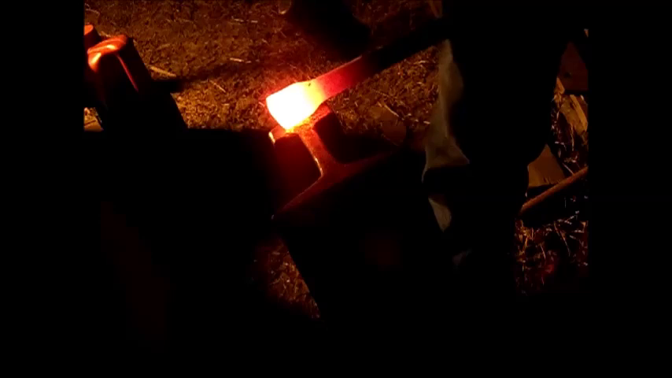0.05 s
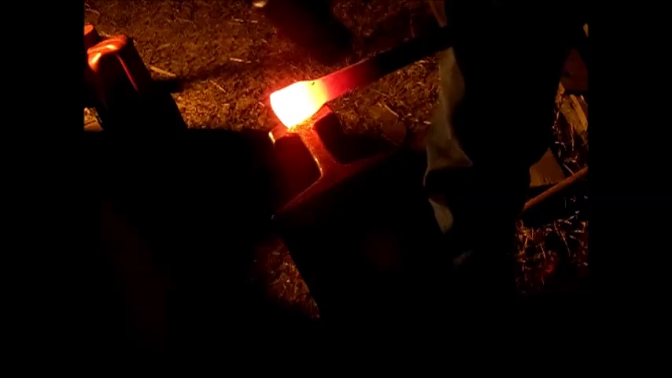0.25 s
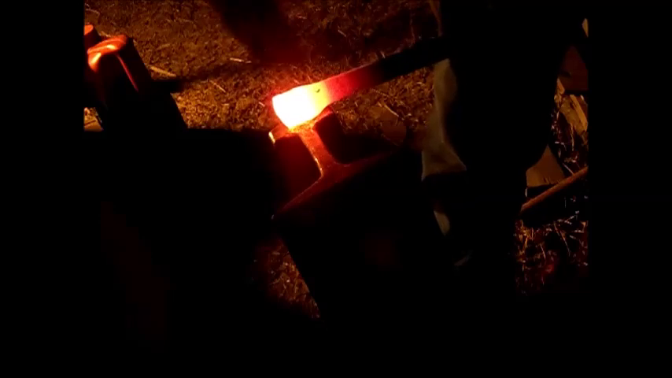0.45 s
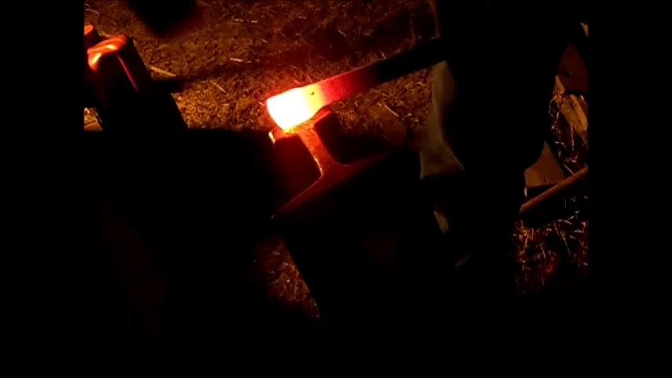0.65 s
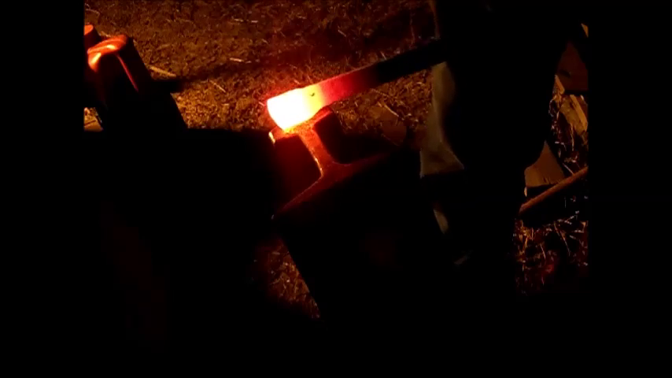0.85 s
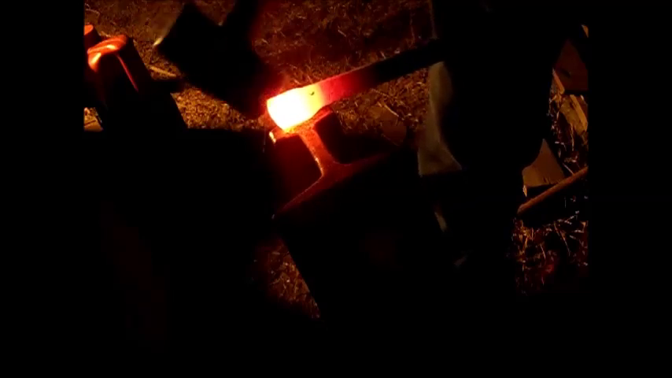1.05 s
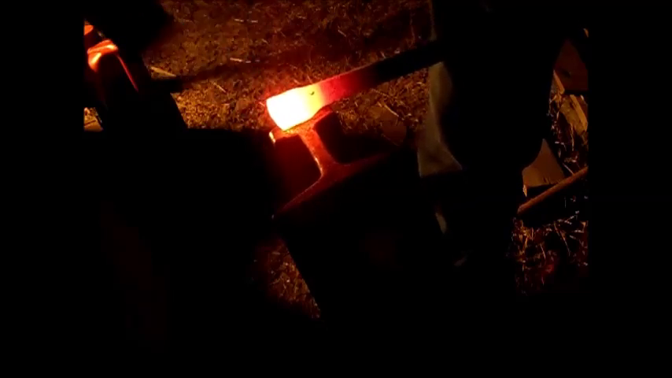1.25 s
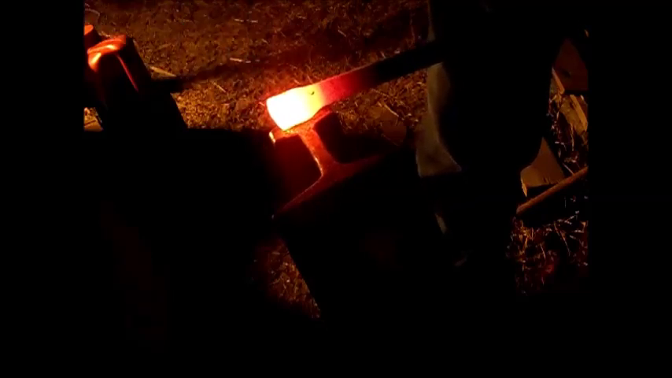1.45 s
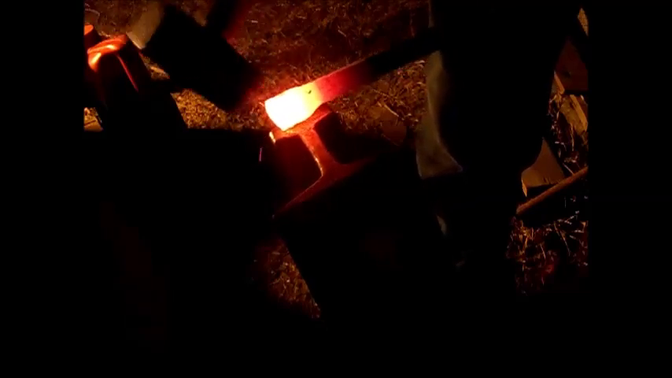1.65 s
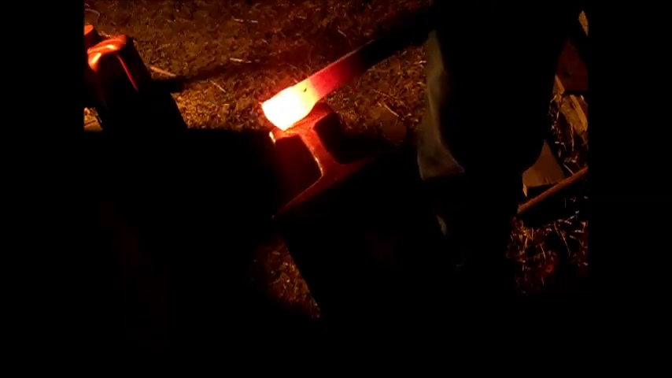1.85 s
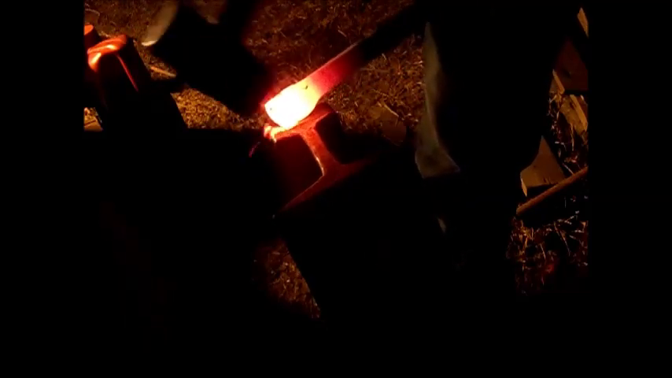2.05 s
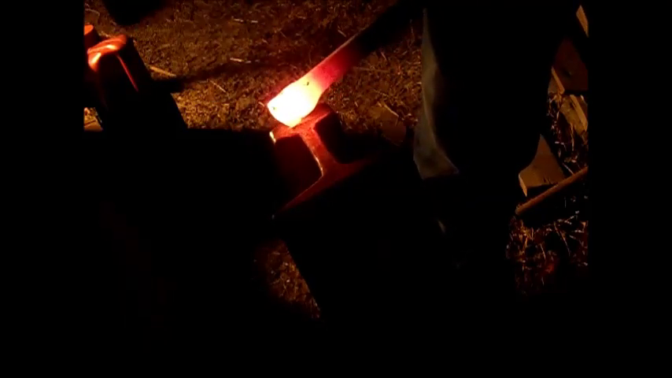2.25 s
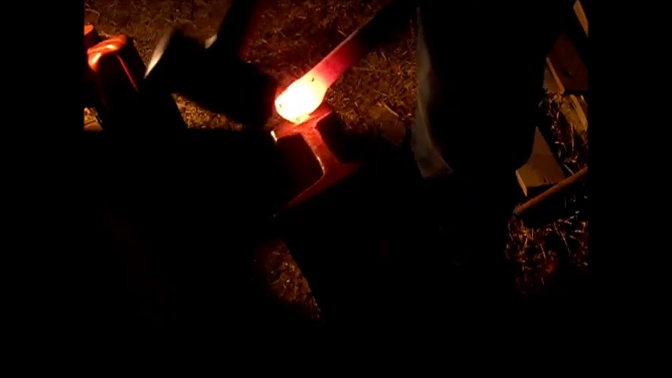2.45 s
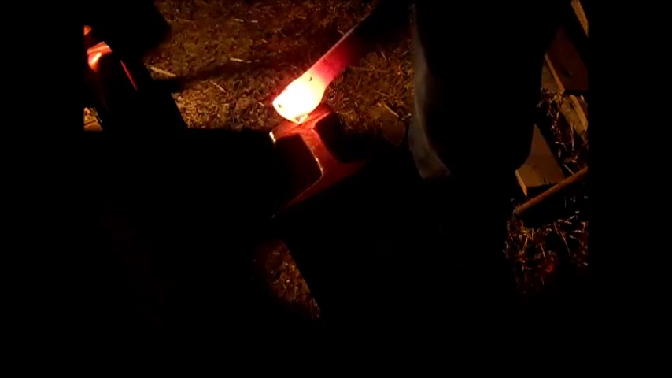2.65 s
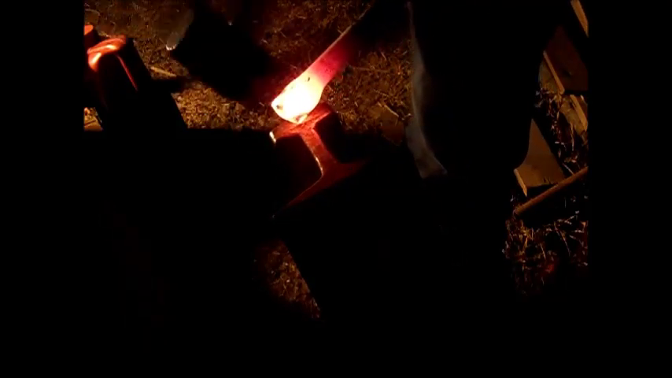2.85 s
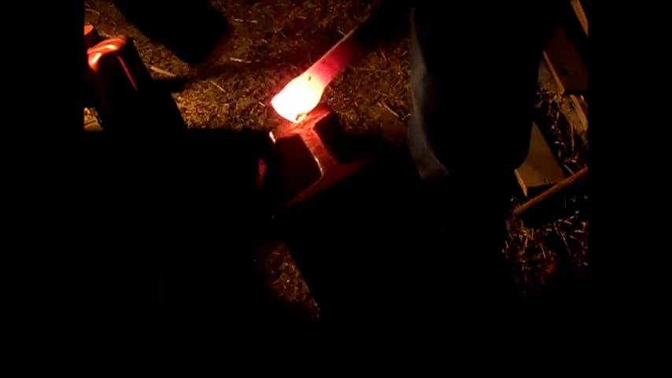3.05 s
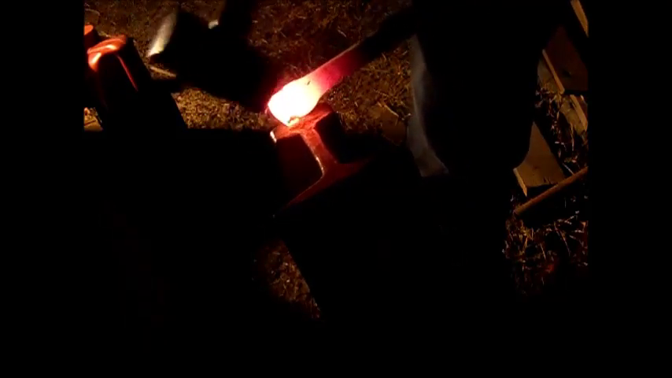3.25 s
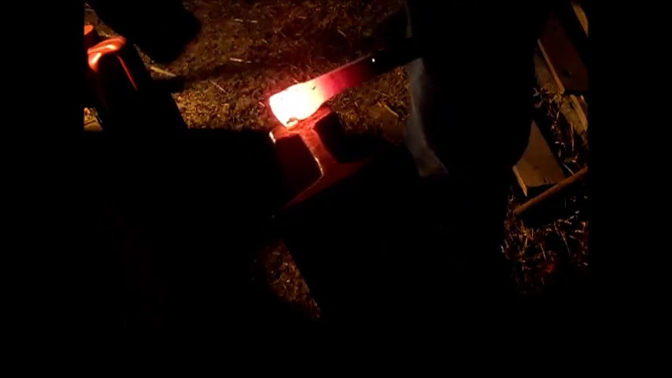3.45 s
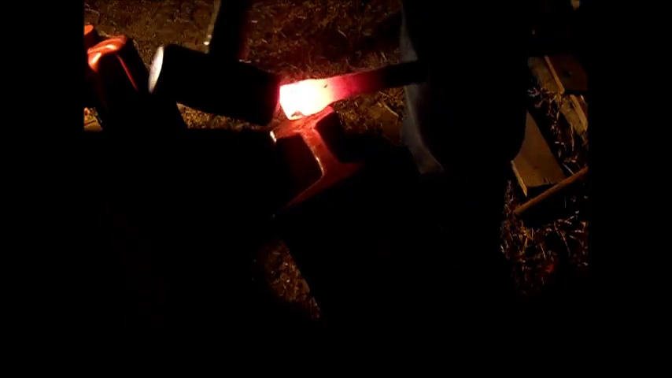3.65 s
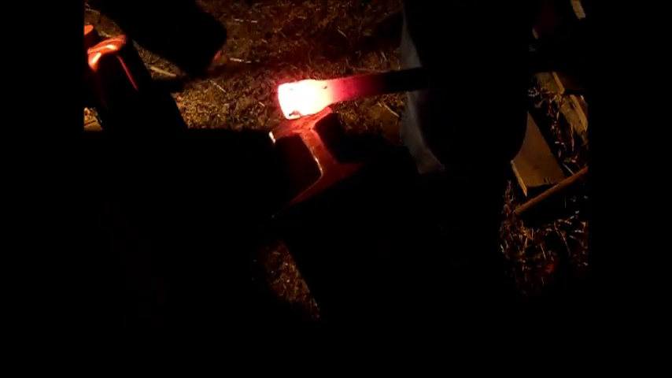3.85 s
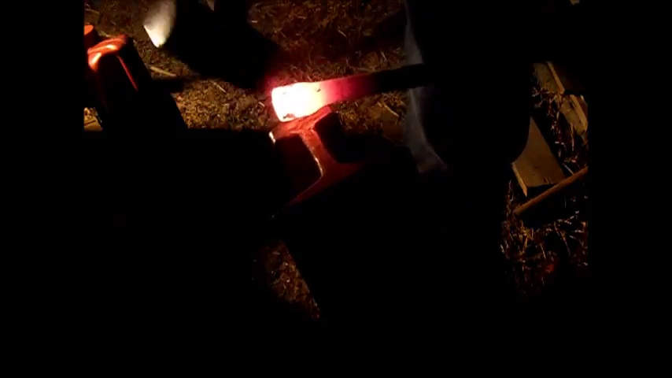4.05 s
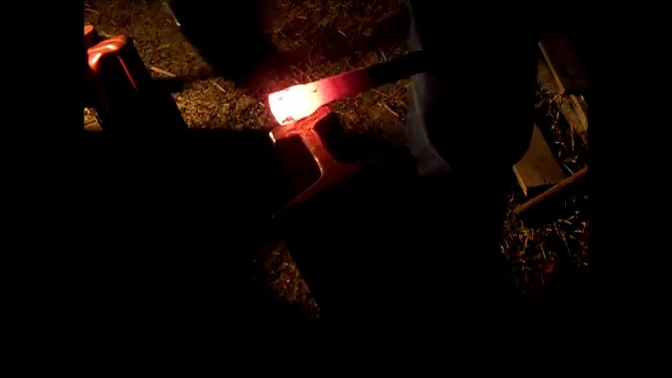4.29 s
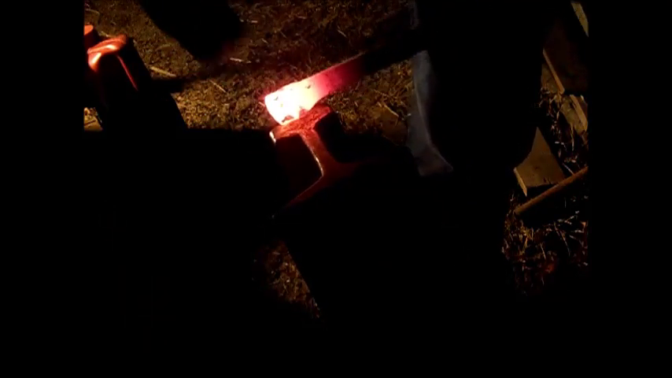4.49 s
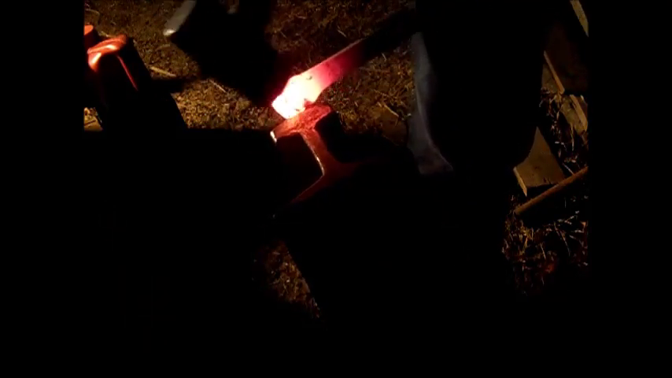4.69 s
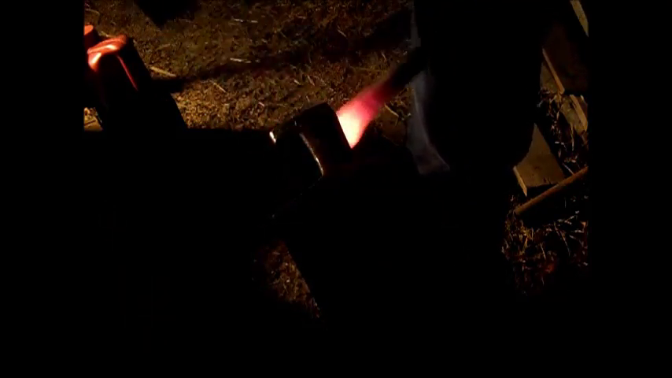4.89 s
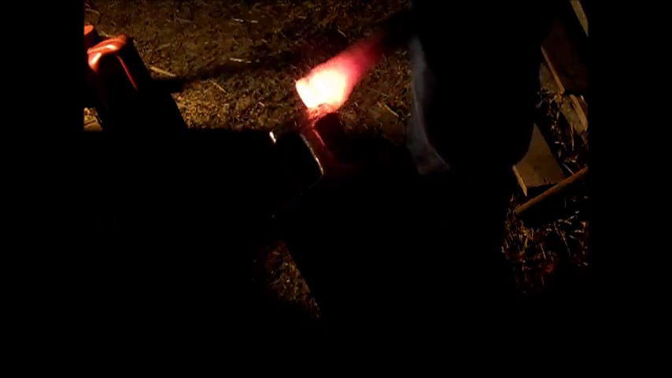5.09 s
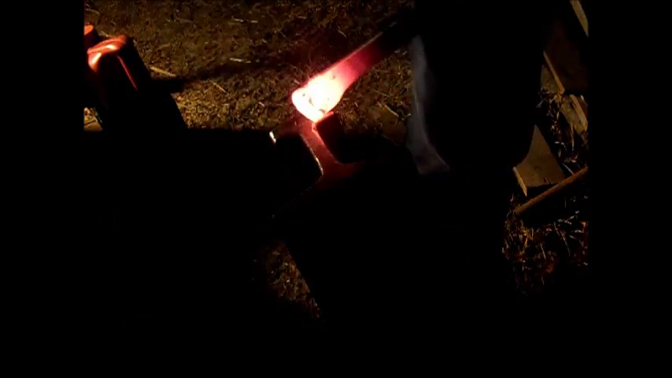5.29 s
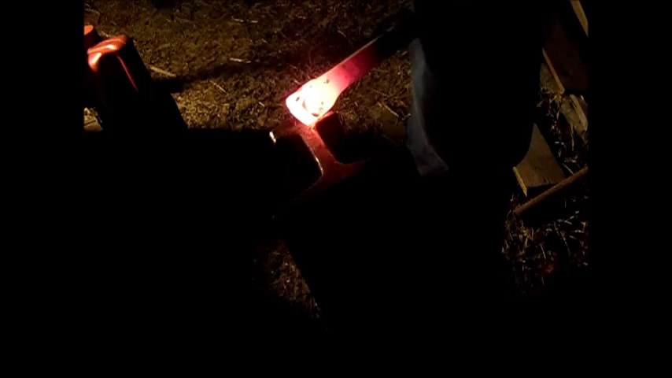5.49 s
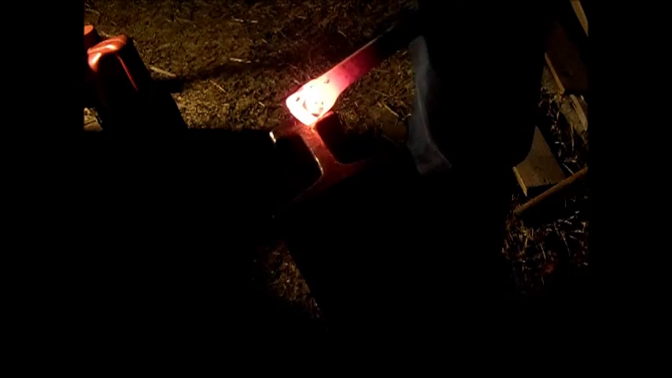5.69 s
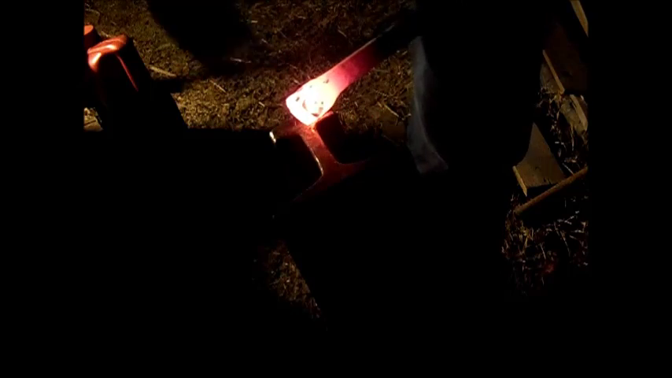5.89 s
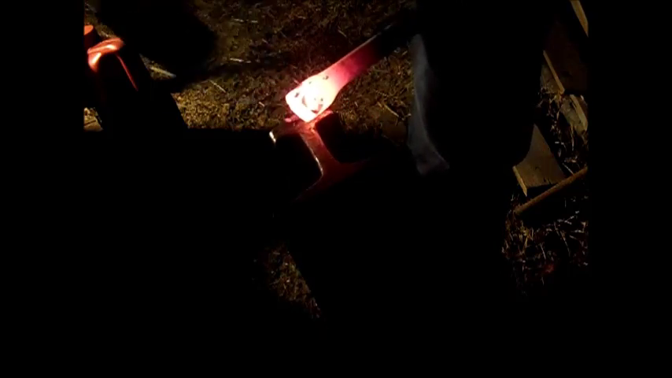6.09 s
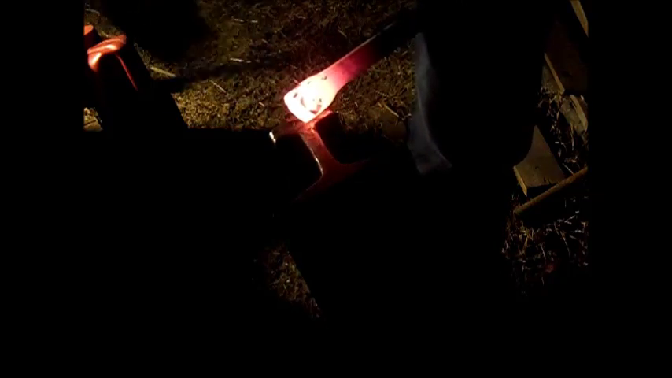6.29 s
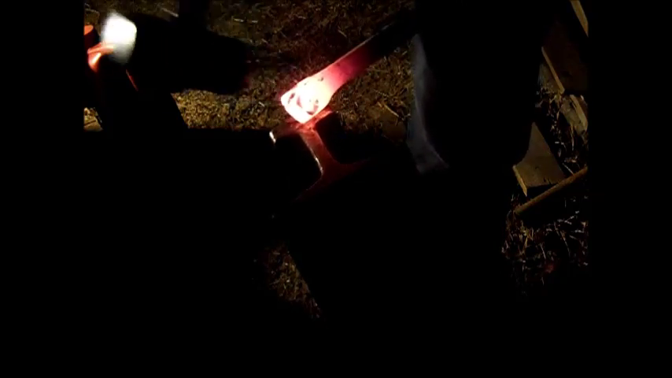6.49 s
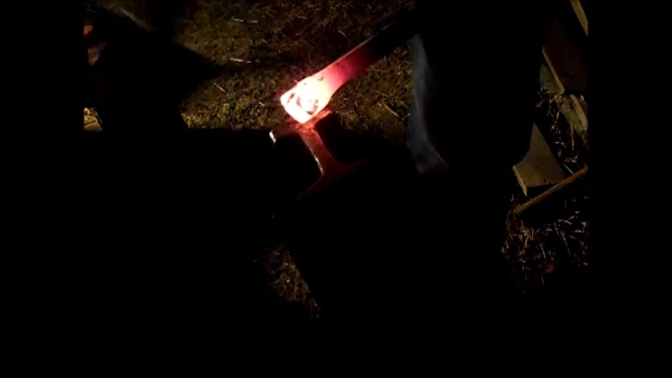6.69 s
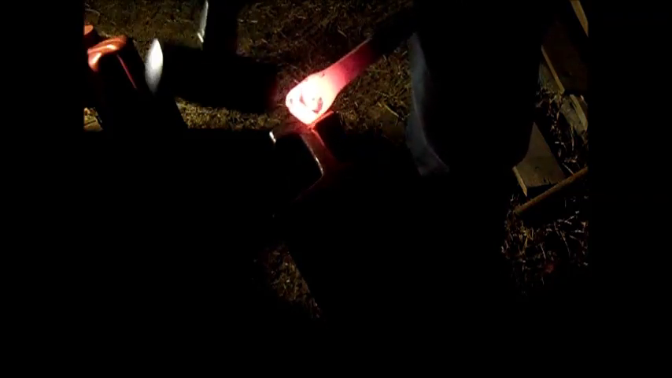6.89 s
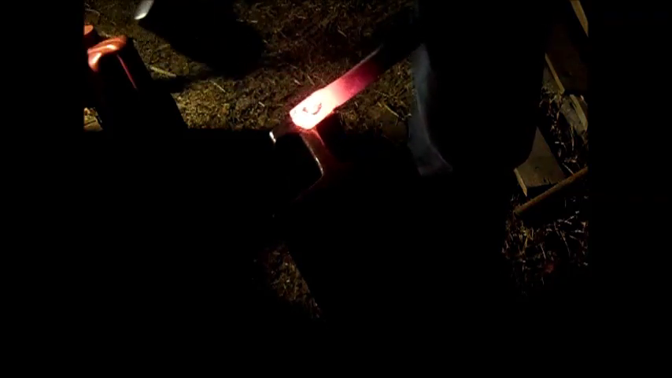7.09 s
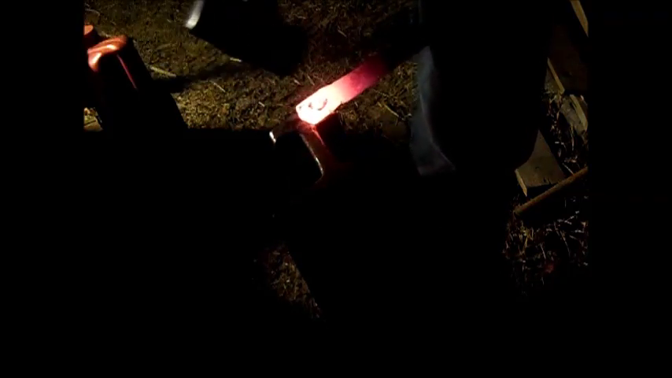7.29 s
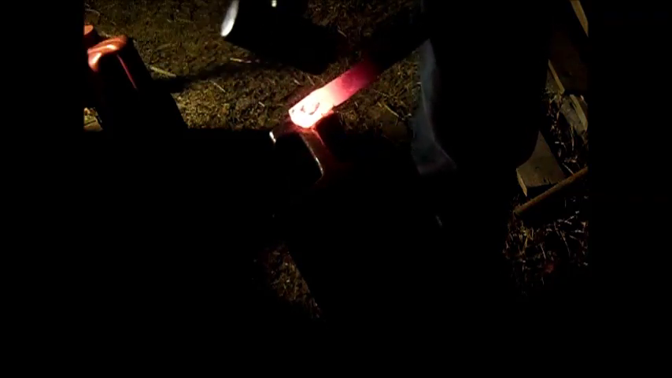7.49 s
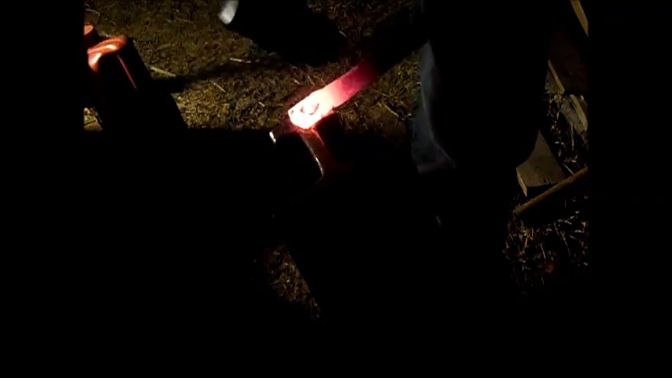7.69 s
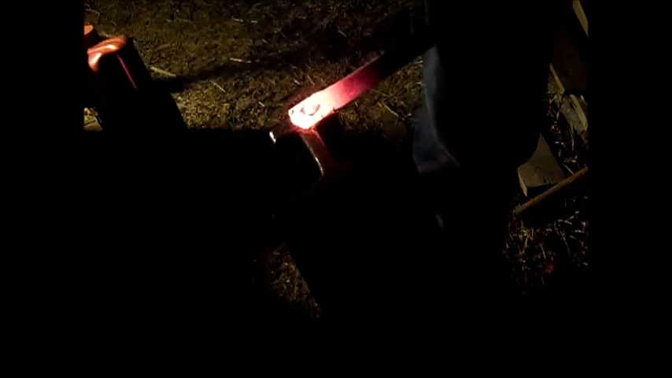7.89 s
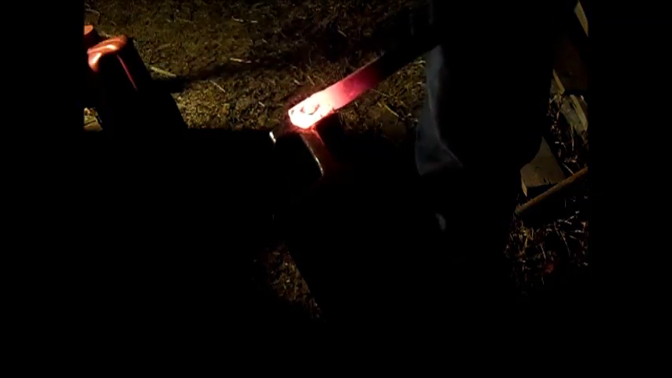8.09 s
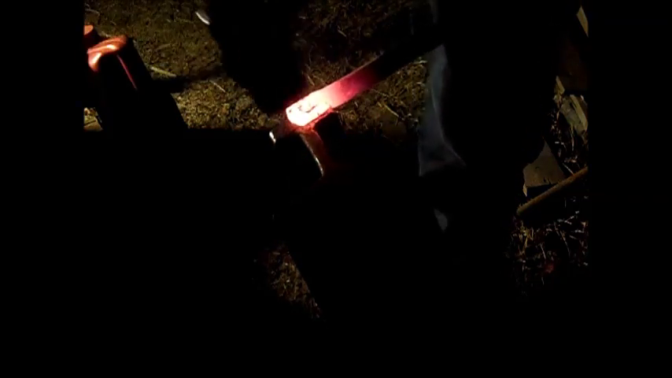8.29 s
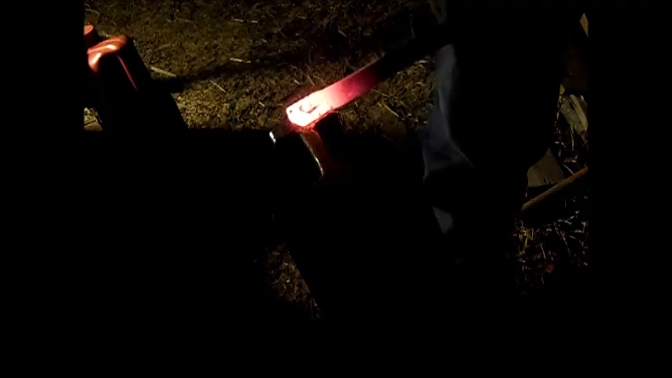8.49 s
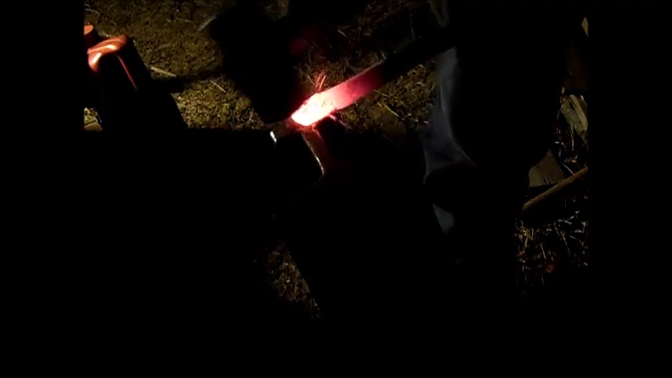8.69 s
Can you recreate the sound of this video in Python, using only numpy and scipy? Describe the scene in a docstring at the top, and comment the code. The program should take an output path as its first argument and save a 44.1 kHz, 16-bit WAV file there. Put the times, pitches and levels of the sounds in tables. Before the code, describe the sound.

A forge blower opens alone, a steady electric whine with harmonics, rushing air and low rumble, with a faint cloth rustle. At about 1.1 s a hard hammer blow cracks on hot steel over a rail anvil, close and slightly overloaded; loose iron rattles after it. More strong blows land at 1.6, 2.05, 2.5 and 2.9 s, the later ones brighter with a thin high hammer ring. Each is short and clanky, with a low stump thump and quick outdoor echo. Weaker hits follow at 3.3, 3.6, 4.0, 4.3 and 4.7 s, with bounces. From 4.8 to 5.4 s cloth rustles and the bar taps and scrapes. Softer blows come at 6.0, 6.4 and 6.8 s, then faint rustles and tiny taps. A light blow at 8.2 s bounces; a stronger, bright one ends near 8.7 s. The blower steps quieter after every blow.

```python
"""A hammer beats a glowing bar on a rail anvil outdoors, near the microphone. Each blow is a noise crack with
echoes, ringing rail modes, a thump of the stump and the hammer head singing high. The bar bounces as scraped,
ringing contacts and loose iron rattles in short ticks. Behind, a forge blower whines (shaft harmonics) and
rushes (shaped noise), a step quieter after every blow; cloth rustles and a low rumble lies underneath.
Blows overload the recorder, which flattens and ducks them."""
import sys
import numpy as np
from scipy import signal
from scipy.fft import rfft, irfft, next_fast_len
from scipy.io import wavfile

SR = 44100
rng = np.random.default_rng(int(sys.argv[2]) if len(sys.argv) > 2 else 0)


def pcm_store(signal):
    """Save signal as 16-bit PCM."""
    levels = np.round(np.clip(np.atleast_2d(signal), -1, 1) * 32767)
    wavfile.write(sys.argv[1], SR, levels.astype(np.int16).T)


N = 385434   # length [samples]


def from_db(db):
    """Gain of a level in dB."""
    return 10 ** (np.asarray(db) / 20)


def rms_one(x):
    """Scaled to rms 1."""
    return x / np.sqrt(np.mean(x ** 2) + 1e-20)


def at_hz(hz, points_hz, values):
    """Reads a table on a log-frequency axis."""
    return np.interp(np.log(hz), np.log(points_hz), values)


def filtered(order, edge_hz, kind, x):
    """Butterworth filter."""
    return signal.sosfilt(signal.butter(order, edge_hz, kind, fs=SR, output="sos"), x)


def smoothed(x, seconds):
    """One-pole smoothing with a time constant."""
    r = np.exp(-1 / (seconds * SR))
    return signal.lfilter([1 - r], [1, -r], x)


def drift(rate_hz):
    """Slow random wander of rms 1, drawn every 40 samples and joined by straight lines."""
    r = np.exp(-80 * np.pi * rate_hz / SR)
    noise = rng.standard_normal(N // 40 + 2002)
    slow = signal.lfilter([1], [1, -2 * r, r * r], noise)[2000:]   # skips the filter's run-in
    return np.interp(np.arange(N) / 40, np.arange(len(slow)), rms_one(slow))


def ring(force, hz, t60):
    """A damped resonator: a unit click sets a sine of height 1 ringing, 60 dB down after t60 seconds."""
    r, w = from_db(-60 / (t60 * SR)), 2 * np.pi * hz / SR
    return signal.lfilter([0, np.sin(w)], [1, -2 * r * np.cos(w), r * r], force + 1e-18)


def ring_each(force, hz, t60):
    """One mode rung by each row of force, all rows with the same energy."""
    sound = ring(force, hz, t60)
    energy = np.mean(sound ** 2, axis=1, keepdims=True)
    return sound * np.sqrt(energy.mean() / energy)


def mode_shares(count, modes, spread_db):
    """Random gain and sign with which each contact wakes each mode."""
    size = (count, modes)
    return from_db(rng.normal(0, spread_db, size)) * rng.choice([-1, 1], size)


def coloured(spectrum):
    """Noise with a given spectrum; rms 1."""
    size = next_fast_len(N)
    hz = np.maximum(np.fft.rfftfreq(size, 1 / SR), 1)
    gain = from_db(at_hz(hz, *np.transpose(spectrum)))
    return rms_one(irfft(rfft(rng.standard_normal(size)) * gain, size)[:N])


def contacts(count, seconds, t60, grind_db):
    """One force a row: a click, then grinding noise that dies away."""
    t = np.arange(int(seconds * SR)) / SR
    force = from_db(grind_db - 60 * t / t60) * rng.standard_normal((count, len(t)))
    force[:, 0] += 1
    return force


def place(sounds, times):
    """Lays each row on the time line."""
    out = np.zeros(N + sounds.shape[1])
    for sound, s in zip(sounds, times):
        start = round(s * SR)
        out[start:start + len(sound)] += sound
    return out[:N]


# frequencies at which the colour of a blow is set: [Hz]
SPOT_HZ = [500, 1100, 2100, 3200, 4700, 6300, 8700]
# how strongly a blow wakes the modes around each of those frequencies: [dB]
SPOT_DB = [-17, -14, -18, -16.5, -18, -17, -20.5]
CLANK_DB, CLANK_OCTAVES = 5.5, .35   # boost at the clank centre, its half-width to 1/e


def blow_colour(thud_db, tilt_db, clank_hz):
    """Spectrum of each blow: a clank hump, extra low thud and a brightness tilt about the fourth frequency."""
    octaves_off = np.log2(SPOT_HZ / clank_hz)
    spot_db = SPOT_DB + CLANK_DB * np.exp(-(octaves_off / CLANK_OCTAVES) ** 2)
    spot_db[:, :1] += thud_db
    spot_db[:, 1:] += tilt_db * np.log2(np.array(SPOT_HZ[1:]) / SPOT_HZ[3])
    return spot_db


# modes of the rail: (frequency [Hz], level [dB], t60 [s])
RAIL_MODES = [(452, -5, 0.078), (640, -1.5, .03), (751, -5.5, 0.047), (1017, 2.5, 0.05), (1195, -3, 0.052),
              (1837, -2.5, .04), (2033, -1.5, 0.057), (2138, -3, 0.065), (2396, -8, .05),
              (2830, -3.5, 0.045), (3107, -1, .04), (3290, -5.5, 0.058), (3688, -10, 0.032),
              (4220, -9, 0.065), (4604, -1, .05), (5015, -4.5, .04), (5360, -8, 0.053), (5800, -10, 0.053),
              (6277, -4, 0.033), (6230, -10, 0.046), (7690, -7, 0.053), (8270, -14, 0.074),
              (9000, -16.5, 0.042), (10130, -12.5, 0.057), (12300, -29.5, .04)]
CRUSH_T60_S, CRUSH_DB = 0.023, -4.5   # grinding that follows the click of the blow


def rail_modes(spot_db, t):
    """Each blow's click and crush ring the rail's modes."""
    force = contacts(len(spot_db), .6, CRUSH_T60_S, CRUSH_DB)
    share = mode_shares(len(spot_db), len(RAIL_MODES), 2.5)
    sound = 0
    for k, (hz, level_db, t60) in enumerate(RAIL_MODES):
        spot = np.array([at_hz(hz, SPOT_HZ, row) for row in spot_db])
        gain = share[:, k] * from_db(level_db + spot)
        swell = 1 - np.exp(-t * hz / 1.4)     # a mode builds up over a few cycles
        sound = sound + gain[:, None] * swell * ring_each(force, hz, t60)
    return sound


CRACK_DB, CRACK_T60_S = 15, 0.049   # decay times of crack and yard hold at 3 kHz
YARD_DB, YARD_T60_S = -8, 0.22
CHATTER_HZ, CHATTER_DB = 110, 1   # the tail is lumpy: the bar chatters on the rail


def crack_and_echoes(spot_db, t):
    """Noise bands share the colour of the blow: a short crack, then a longer yard tail; treble dies first."""
    size = (len(spot_db), len(t))
    chatter_db = CHATTER_DB * rms_one(filtered(2, CHATTER_HZ, "low", rng.standard_normal(size)))
    sound = 0
    for k, hz in enumerate(SPOT_HZ):
        crack = from_db(CRACK_DB - 60 * t * (hz / 3000) ** 0.059 / CRACK_T60_S)
        echoes = from_db(YARD_DB + chatter_db - 60 * t * (hz / 3000) ** 0.39 / YARD_T60_S)
        noise = (crack + echoes) * rng.standard_normal(size)
        band = filtered(2, [hz / 1.4, hz * 1.6], "band", noise) * np.sqrt(5000 / hz)
        sound = sound + from_db(spot_db[:, k:k + 1]) * band * (1 - np.exp(-t * hz / 1.2))
    air = filtered(2, 10500, "high", rng.standard_normal(size))
    return sound + from_db(spot_db[:, -1:] - 6 - 60 * t / .03) * air


HAMMER_LOW_HZ, HAMMER_LOW_T60_S = 6095, .12
HAMMER_HIGH_HZ, HAMMER_HIGH_T60_S = 10997, 0.41
# low ring: level at strength 0 and tilt 0, then its shares of strength and brightness tilt
HAMMER_LOW_DB, HAMMER_LOW_FOLLOWS, HAMMER_LOW_PER_TILT = -16, 0.64, 0.89


def hammer_ring(strength_db, tilt_db, high_db, click):
    """The hammer head rings in a low mode and in a high pair, 22 Hz apart, that beats."""
    low_db = HAMMER_LOW_DB + HAMMER_LOW_FOLLOWS * strength_db + HAMMER_LOW_PER_TILT * tilt_db
    low = ring(click, HAMMER_LOW_HZ, HAMMER_LOW_T60_S)
    beat = ring(click, HAMMER_HIGH_HZ, HAMMER_HIGH_T60_S)
    beat = beat + 0.12 * ring(click, HAMMER_HIGH_HZ + 22, HAMMER_HIGH_T60_S)
    return from_db(low_db) * low + from_db(high_db) * beat


STUMP_HZ, STUMP_T60_S = 45, .15
STUMP_DB, STUMP_FOLLOWS = -20.5, .25   # level at strength 0, share of strength
# a higher, shorter mode; its level is relative to the thump
STUMP_KNOCK_HZ, STUMP_KNOCK_DB, STUMP_KNOCK_T60_S = 162, -8.5, 0.05


def stump_thump(strength_db, click, t):
    """The stump under the rail answers with a soft low thump and a knock."""
    thump = ring(click, STUMP_HZ, STUMP_T60_S) * (1 - np.exp(-t / .012))
    knock = from_db(STUMP_KNOCK_DB) * ring(click, STUMP_KNOCK_HZ, STUMP_KNOCK_T60_S)
    return from_db(STUMP_DB + STUMP_FOLLOWS * strength_db) * (thump + knock)


# hammer blows: (time [s], strength [dB], low thud over the rest [dB], brightness tilt [dB per octave],
#                clank centre [Hz], high hammer ring [dB], bounce of the bar [dB])
BLOWS = [(1.105, -3.5, 9, 1, 3200, -47, -28), (1.596, -1.5, 6, 0, 4700, -36, -29.5),
         (2.052, -0.5, -8, 2.5, 4400, -38.5, -15), (2.485, -2.5, -2, 6, 3300, -21, -32),
         (2.895, -2.5, -0.5, 3.5, 3200, -24.5, -19.5), (3.273, -8, -3, 4, 3500, -34, -15.5),
         (3.629, -17.5, 10, -2.5, 3600, -50, -40), (3.993, -18, 10, -1, 4700, -53, -29),
         (4.342, -12.5, 3, 0.5, 4400, -41.5, -33), (4.713, -10.5, -4, 2.5, 6300, -34.5, -24),
         (5.975, -13.5, 3.5, 3, 4700, -51, -22.5), (6.394, -18.5, 8, -0.5, 4700, -47, -27.5),
         (6.789, -17, 3.5, 0.5, 5500, -63, -45), (8.223, -19, 0.5, 3, 6100, -53, -37),
         (8.687, -6.5, -18, 3, 3300, -23.5, -30)]
RADIATE_FROM_HZ = 326   # the rail is too small to radiate lower


def blows():
    """Every blow drives rail, crack, echoes, hammer head and stump together."""
    rows = np.array(BLOWS)
    strength_db, thud_db, tilt_db, clank_hz, high_db = rows[:, 1:6].T[:, :, None]
    spot_db = blow_colour(thud_db, tilt_db, clank_hz)
    t = np.arange(int(.6 * SR)) / SR
    click = t == 0
    rail = rail_modes(spot_db, t) + crack_and_echoes(spot_db, t)
    sound = from_db(strength_db) * filtered(4, RADIATE_FROM_HZ, "high", rail)
    sound = sound + hammer_ring(strength_db, tilt_db, high_db, click)
    sound = sound * (1 - np.exp(-t / 0.00038))     # hot steel gives way: the attack is rounded
    return place(sound + stump_thump(strength_db, click, t), rows[:, 0])


# the bar bounces again or is set down on the rail: (time [s], strength [dB])
TAPS = [(3.3242, -21), (4.3963, -28), (4.428, -47), (4.8587, -45), (4.8832, -44), (4.9003, -40),
        (4.914, -43), (4.9413, -45.5), (5.0606, -47), (5.099, -44), (5.131, -40.5), (5.1505, -47),
        (5.3315, -25.5), (5.379, -36), (5.4056, -43), (7.6389, -57.5), (7.746, -52.5), (7.7634, -48),
        (8.2657, -32), (8.2844, -32)]
# modes of bar and tongs: (frequency [Hz], level [dB], t60 [s])
BAR_MODES = [(415, -3.5, 0.044), (1050, -3, .025), (1226, -2, 0.039), (2010, 0.5, .03), (2383, -3.5, 0.026),
             (3100, -0.5, .03), (3354, -7, 0.037), (4440, -2.5, 0.023), (4657, -8.5, .03),
             (4960, -4, 0.019), (6300, -15, 0.012)]
BOUNCE_S = .0291   # the bar lands again this long after a blow
TAP_TILT_DB, TAP_TILT_PER_DB = 6, 0.1963   # harder contacts are brighter [dB per octave]
BAR_RING_DB, SCRAPE_DB = -27, -3.0


def taps():
    """Light contacts scrape and ring the bar briefly."""
    bounces = [(row[0] + BOUNCE_S, row[-1]) for row in BLOWS]
    s, strength_db = np.transpose(TAPS + bounces)
    tilt_db = TAP_TILT_DB + TAP_TILT_PER_DB * strength_db
    force = contacts(len(s), 0.12, 0.052, -1.5)
    share = mode_shares(len(s), len(BAR_MODES), 1.2)
    sound = 0
    for k, (hz, level_db, t60) in enumerate(BAR_MODES):
        gain = share[:, k] * from_db(level_db + BAR_RING_DB + tilt_db * np.log2(hz / 2500))
        sound = sound + gain[:, None] * ring_each(force, hz, t60)
    scrape = from_db(SCRAPE_DB) * filtered(2, [600, 5600], "band", force)
    return place(from_db(strength_db)[:, None] * (sound + scrape), s)


# loose iron rattles: (time [s], strength [dB])
TICKS = [(1.1954, -39), (1.2057, -28), (1.215, -34), (1.2264, -31), (1.239, -27), (1.2566, -27),
         (1.669, -27), (1.676, -26.5), (1.683, -26), (1.692, -32), (1.7094, -25.5), (2.1345, -30),
         (2.141, -31.5), (2.158, -32), (2.987, -35), (3.4878, -43), (3.679, -37), (4.6204, -44),
         (4.7898, -35), (4.8094, -50), (4.8514, -51), (6.044, -37), (6.0624, -36), (6.079, -44),
         (6.1937, -42), (6.4734, -39), (6.4894, -47), (6.6664, -50)]
# modes of the loose iron: (frequency [Hz], level [dB], t60 [s])
LOOSE_MODES = [(3320, -11, 0.011), (6350, -13, 0.0043), (7400, -17, 0.0035), (10500, -39.5, .003)]


def rattle():
    """Short dry ticks: softened grinding contacts ring the loose iron."""
    s, strength_db = np.transpose(TICKS)
    force = contacts(len(s), 0.023, 0.011, -1.8)
    force *= 1 - np.exp(-np.arange(force.shape[1]) / SR / 0.00055)
    sound = sum(from_db(level_db) * ring(force, hz, t60) for hz, level_db, t60 in LOOSE_MODES)
    return place(from_db(strength_db)[:, None] * sound, s)


STEP_S = .1   # time constant of a step


def stepping(first_db, last_db, keep):
    """A level that closes part of its gap to a last value after every blow."""
    struck = np.zeros(N)
    struck[(np.array(BLOWS)[:, 0] * SR).astype(int)] = 1
    return last_db + (first_db - last_db) * keep ** smoothed(np.cumsum(struck), STEP_S)


# spectrum of the blower's rush: (frequency [Hz], relative density [dB per Hz])
RUSH_SPECTRUM = [(59, -31), (100, -10), (164, -7.5), (238, -5), (287, -6), (1530, -19), (1690, -17.5),
                 (2120, -20.5), (2500, -18), (3080, -22), (5380, -25), (13900, -31.5)]


def rush():
    """Moving air as shaped noise, its level wandering a little."""
    return from_db(2.0 + .6 * drift(10)) * coloured(RUSH_SPECTRUM)


# blower whine: (multiple of the shaft speed, level relative to the blower level [dB])
WHINE = [(2, -8), (4, -2.5), (6, -12.5), (7, -12), (9, -9.5), (10, -9.5), (15, -13), (28, -11), (38, -29.5),
         (42, -2), (44, -36), (47, -28), (49, -18.5), (60, -19), (91, -18), (92, -22), (139, -19.5),
         (163, -33)]
SHAFT_HZ = 59.21


def whine():
    """Harmonics of one slightly unsteady shaft, each wavering in level."""
    turn = 2 * np.pi * np.cumsum(SHAFT_HZ * (1 + 0.00055 * drift(3))) / SR
    return sum(from_db(level_db + 1.1 * drift(8)) * np.sin(order * turn + rng.uniform(0, 2 * np.pi))
               for order, level_db in WHINE)


# cloth rustles as the smith shifts: (time [s], swell relative to the blower level [dB])
RUSTLES = [(0.239, 1.5), (4.835, 6.5), (5.502, -1), (7.028, -9), (7.2, -2.5), (7.96, -14)]
RUSTLE_S, SWING_BEFORE_S, SWING_DB = .045, 0.077, -6.5   # and in the swing before every blow


def cloth():
    """Flickering band noise swells with each movement."""
    t = np.arange(N) / SR
    moves = RUSTLES + [(row[0] - SWING_BEFORE_S, SWING_DB) for row in BLOWS]
    swell = sum(from_db(level_db) * np.exp(-((t - at) / RUSTLE_S) ** 2) for at, level_db in moves)
    noise = rms_one(filtered(1, [2500, 9000], "band", rng.standard_normal(N)))
    return from_db(-2.5 + 3.5 * drift(150)) * swell * noise


# spectrum of the low rumble: (frequency [Hz], relative density [dB per Hz])
RUMBLE_SPECTRUM = [(12, -51), (20, -4), (86, 2.5), (129, -5), (147, -15), (182, -7.5), (208, -16.5),
                   (239, -4), (261, -44), (400, -24), (520, -76.5), (880, -120)]
# level at first and in the end [dB], share of the gap kept after each blow
RUMBLE_DB, RUMBLE_LOW_DB, RUMBLE_KEEP = -39.5, -51, 0.77


def rumble():
    """Low shaped noise that steps down with the blows."""
    level_db = stepping(RUMBLE_DB, RUMBLE_LOW_DB, RUMBLE_KEEP) + 0.31 * drift(3.9)
    return from_db(level_db) * coloured(RUMBLE_SPECTRUM)


# level at first and in the end [dB], share of the gap kept after each blow
BLOWER_DB, BLOWER_LOW_DB, BLOWER_KEEP = -42.5, -68, .87


def background():
    """Rush, whine and cloth share one stepping level; the rumble has its own."""
    level_db = stepping(BLOWER_DB, BLOWER_LOW_DB, BLOWER_KEEP)
    return from_db(level_db) * (rush() + whine() + cloth()) + rumble()


def scene():
    """Everything at one microphone."""
    return (blows() + taps() + rattle() + background())[None]


# overload ceiling at first and in the end [dB], share of the gap kept after each blow
CEILING_DB, CEILING_LOW_DB, CEILING_KEEP = 2.0, -5.5, .45
DUCK_FROM_DB, DUCK_SHARE = -12.5, 0.52   # threshold, share of the excess taken off
RELEASE_DB_S, ATTACK_S = 159, 0.059   # fall of the held excess [dB/s], smoothing of the gain [s]
CUTOFF_HZ = 15250   # 60 dB down from here up


def record(dry):
    """Blows flatten at the ceiling; loud sound pulls the gain down, the held excess falls at a fixed rate."""
    t = np.arange(N) / SR
    top = from_db(stepping(CEILING_DB, CEILING_LOW_DB, CEILING_KEEP))
    clipped = dry / (1 + (dry / top) ** 8) ** (1 / 8)
    over_db = np.maximum(20 * np.log10(np.abs(clipped[0]) + 1e-9) - DUCK_FROM_DB, 0)
    fall_db = RELEASE_DB_S * t
    held_db = np.maximum(np.maximum.accumulate(over_db + fall_db) - fall_db, 0)
    ducked = clipped * from_db(-DUCK_SHARE * smoothed(held_db, ATTACK_S))
    lowpass = signal.cheby2(12, 60, CUTOFF_HZ, fs=SR, output="sos")
    return np.clip(signal.sosfilt(lowpass, ducked), -1, 1)


dry = scene()
out = record(dry)
pcm_store(out)
```